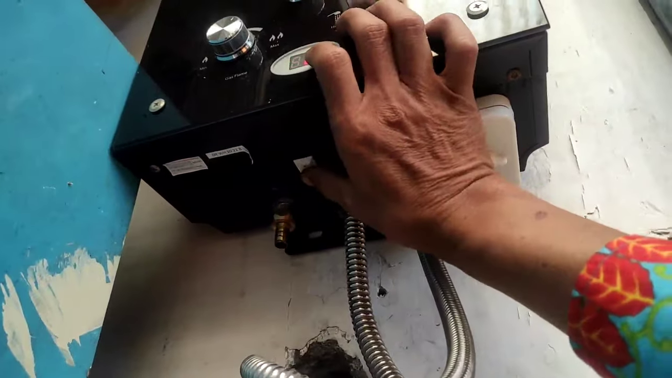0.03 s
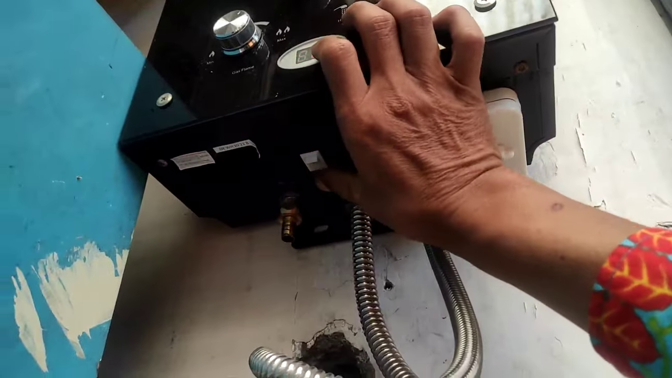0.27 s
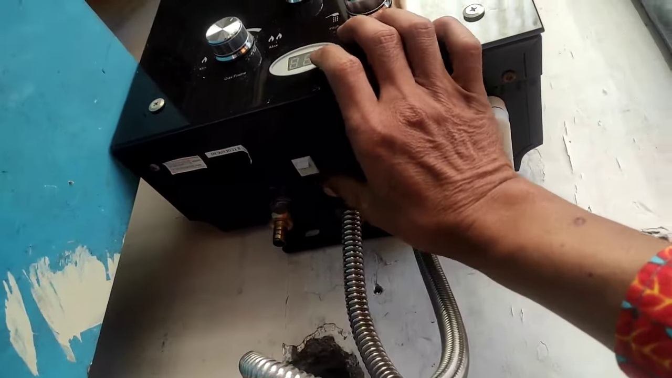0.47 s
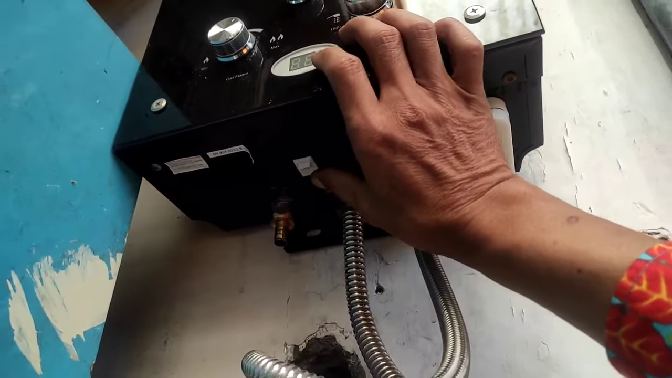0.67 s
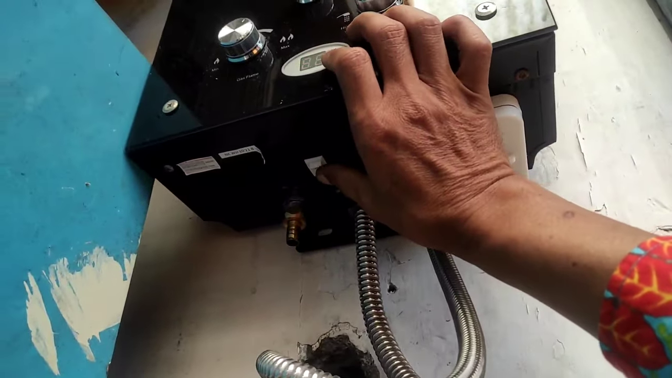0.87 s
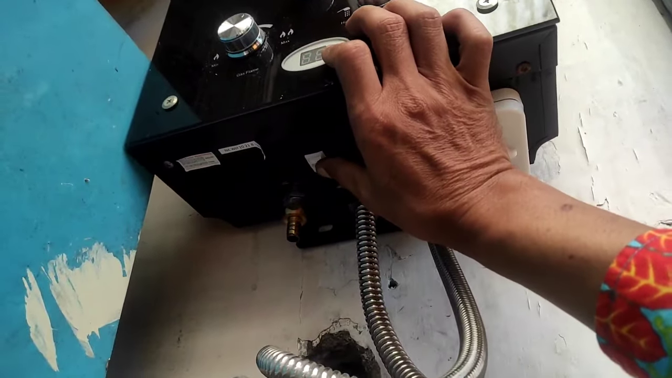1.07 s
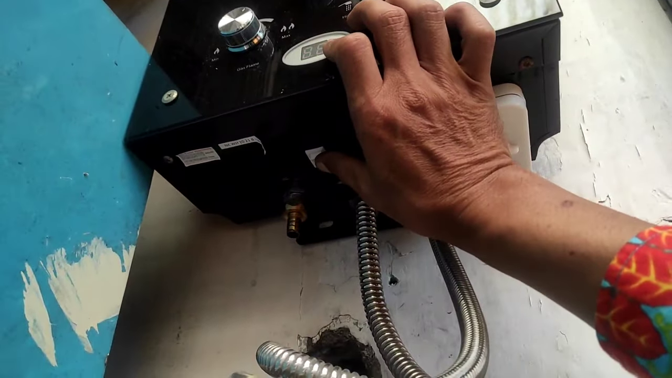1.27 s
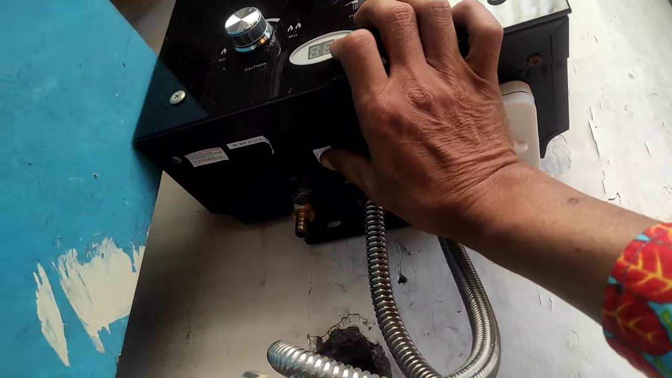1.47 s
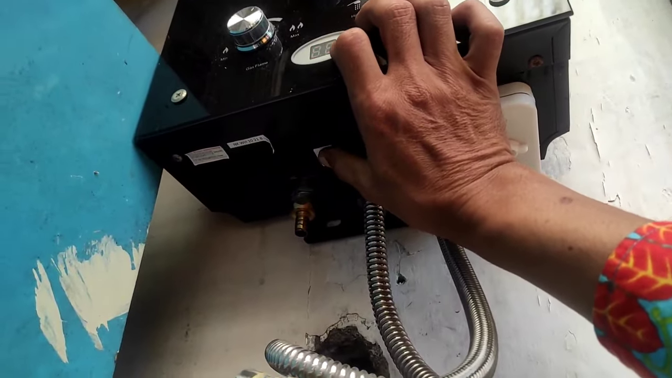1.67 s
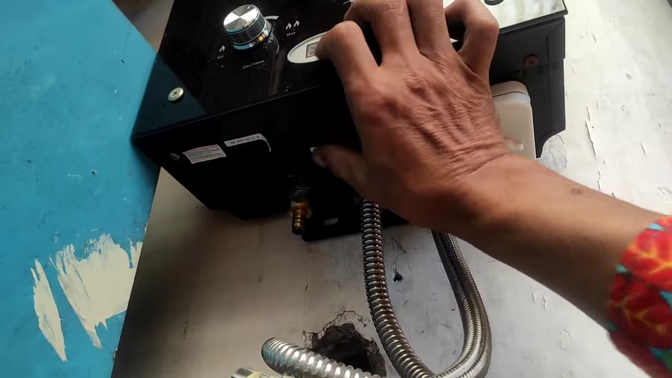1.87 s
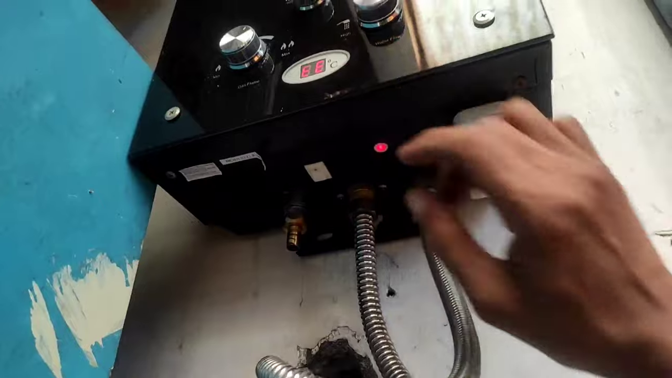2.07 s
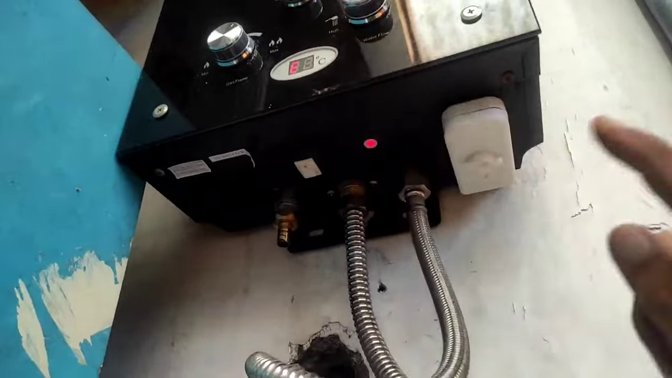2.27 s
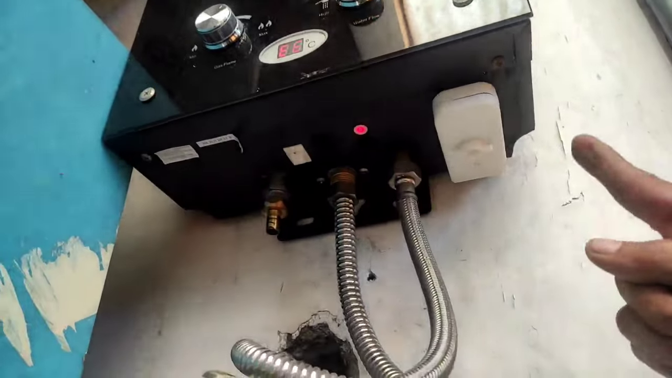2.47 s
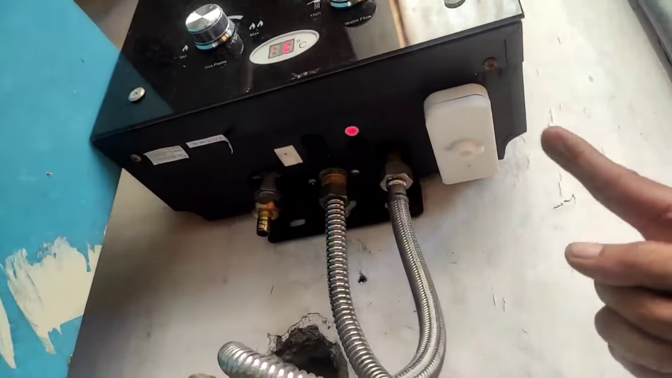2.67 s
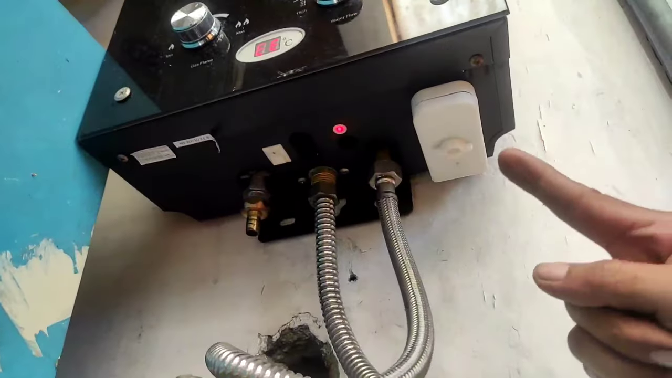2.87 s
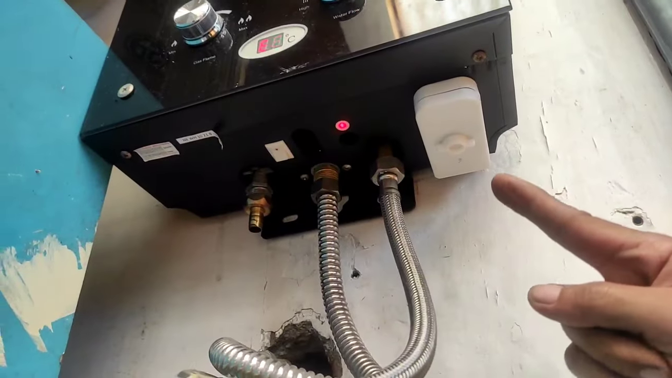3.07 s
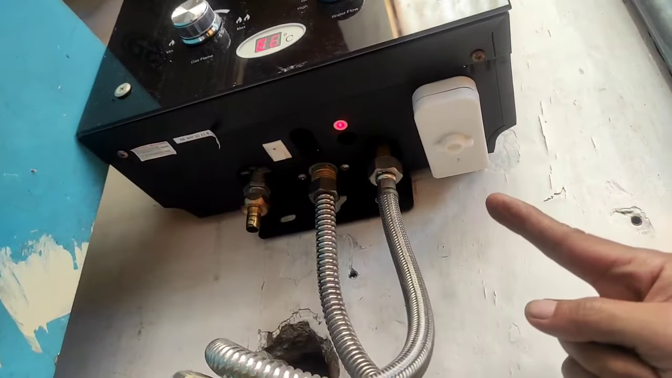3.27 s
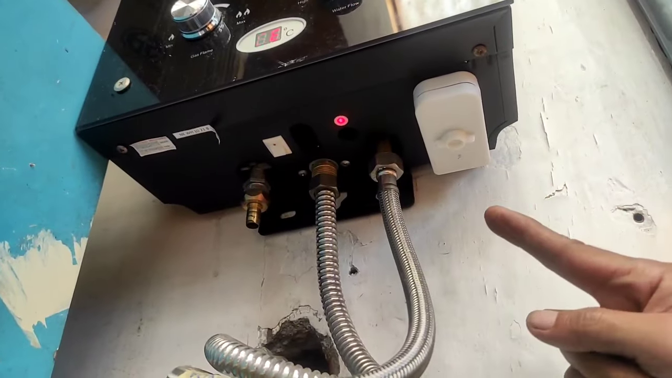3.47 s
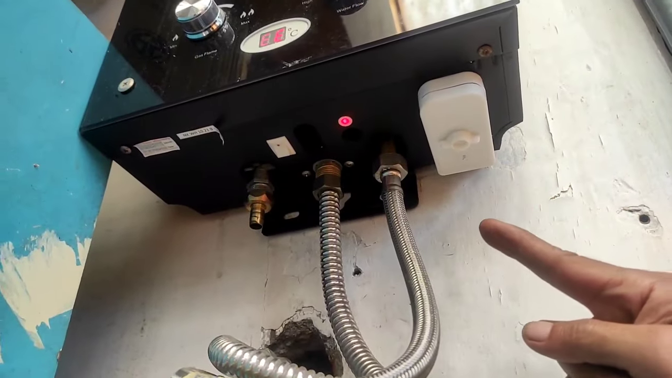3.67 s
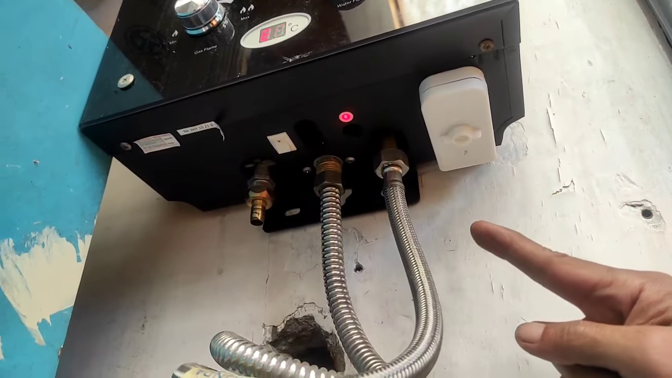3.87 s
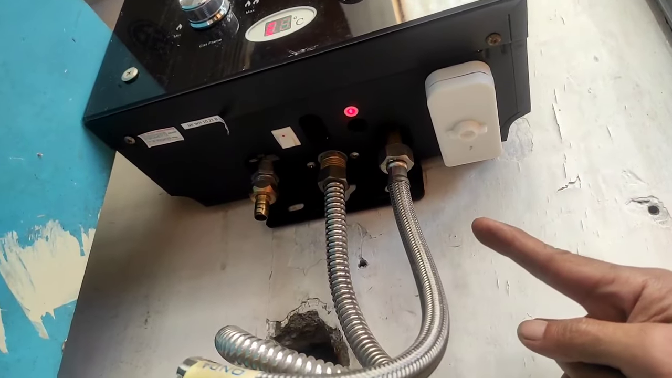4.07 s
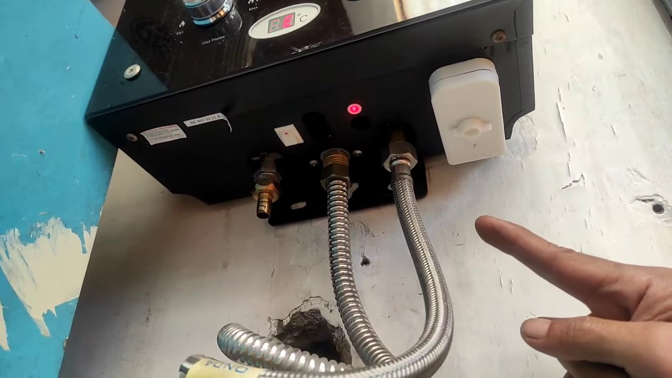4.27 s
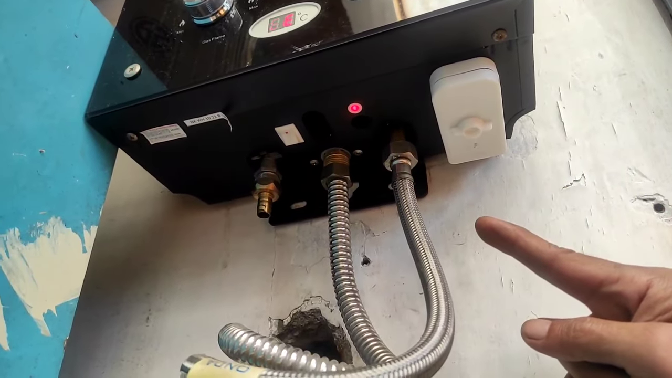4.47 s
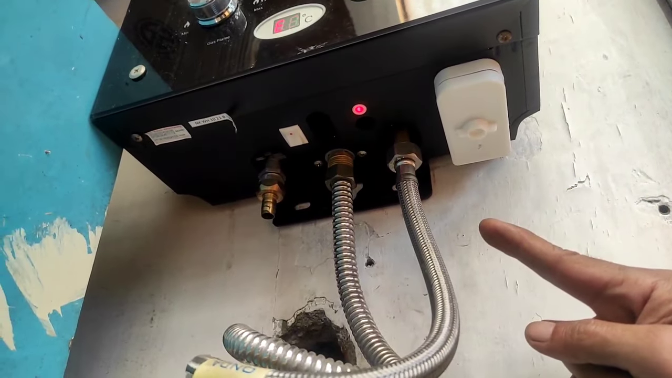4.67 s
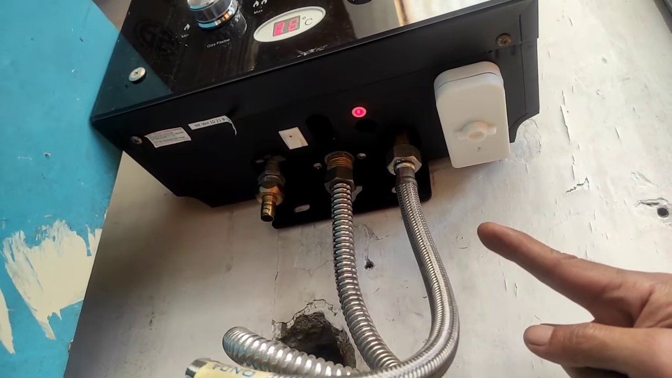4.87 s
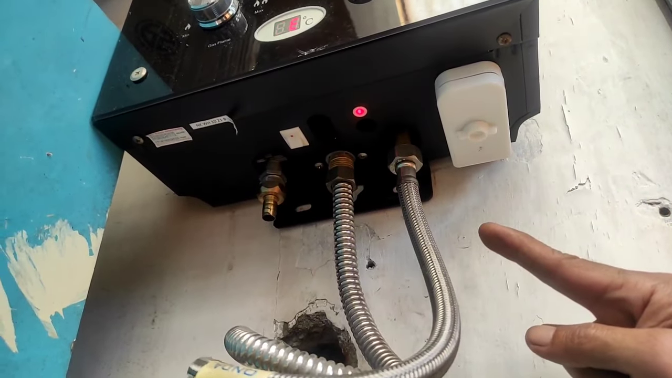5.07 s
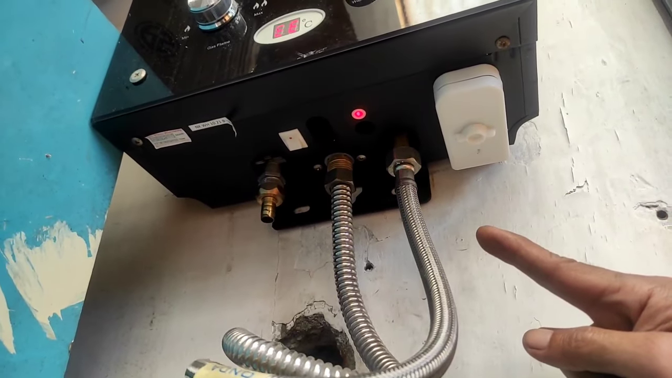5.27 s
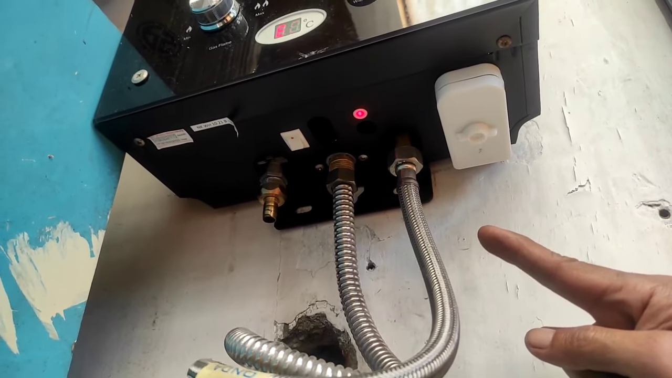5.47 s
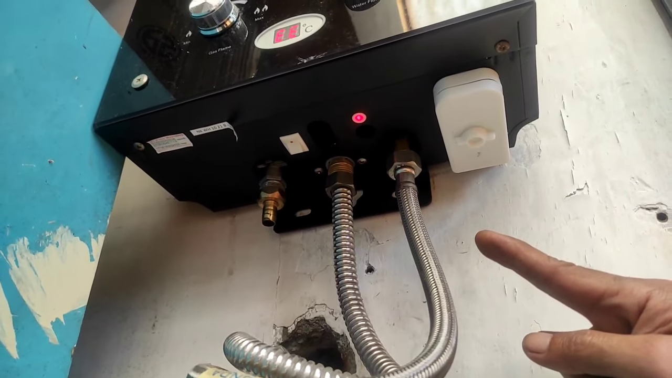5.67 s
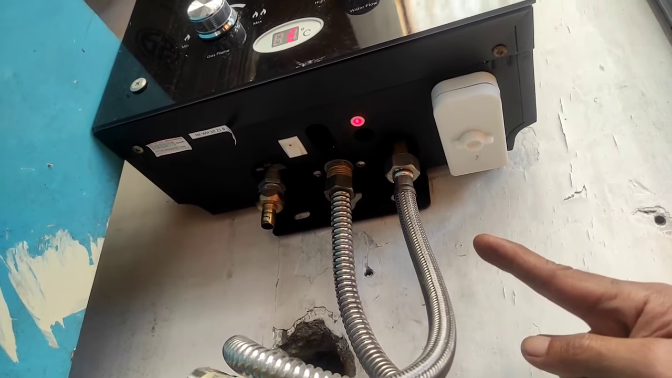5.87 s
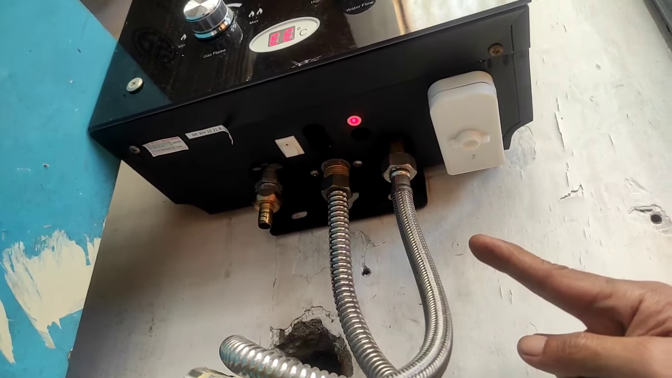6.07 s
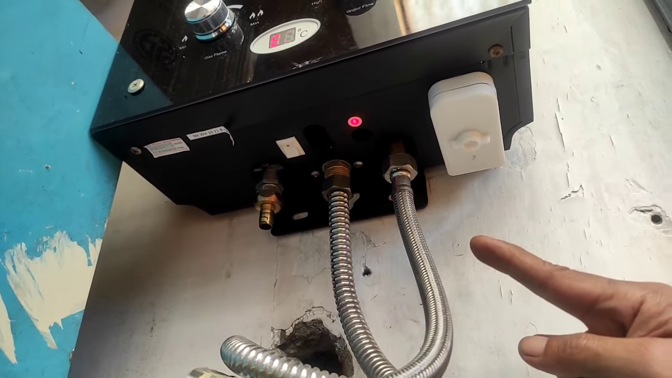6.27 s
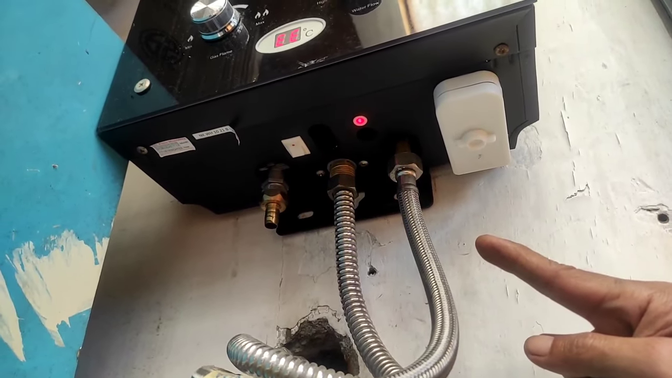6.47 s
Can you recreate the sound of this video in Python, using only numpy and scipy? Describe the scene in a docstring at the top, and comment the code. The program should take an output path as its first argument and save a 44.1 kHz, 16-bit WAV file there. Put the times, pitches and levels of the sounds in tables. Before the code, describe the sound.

Close metallic clicks and a casing knock, then rapid bright electric sparking at about fourteen ticks a second over a low workshop hum and faint hiss.

```python
"""A small workshop with a low hum and thin air noise, where a wall-mounted gas water heater is heard close by.
Its switch clicks, then snaps 1.6 s later, and knocks the sheet-metal casing: noise bursts through resonances.
The igniter sparks about 14 times a second, more slowly for a moment; each crack rings the burner chamber.
A solenoid valve clacks open and a faint flow of filtered noise hisses, but no flame is heard."""
import sys
import numpy as np
from scipy import signal
from scipy.fft import rfft, irfft, next_fast_len
from scipy.io import wavfile
from scipy.ndimage import uniform_filter1d, map_coordinates

SR = 44100
rng = np.random.default_rng(int(sys.argv[2]) if len(sys.argv) > 2 else 0)


def unload_wav(signal):
    """Save mono or channel-first audio to the path in sys.argv[1] as 16-bit WAV at rate SR, clipped to [-1, 1]."""
    wavfile.write(
        sys.argv[1],
        SR,
        np.round(np.clip(np.atleast_2d(signal).T, -1, 1) * 32767).astype(np.int16),
    )


N = 287973  # length of the scene in samples
SIZE = 16384  # length of one short sound in samples
HZ = np.fft.rfftfreq(SIZE, 1 / SR)
T = np.arange(SIZE) / SR
VALVE_S = 2.1992  # the solenoid valve pulls in
FLEX_S = 0.00277  # the casing knocks this long after a blow


def amp(db):
    """Turn decibels into gain."""
    return 10 ** (np.asarray(db) / 20)


def unit(x):
    """Scale to rms 1."""
    return x / np.sqrt(np.mean(x ** 2) + 1e-20)


def along(points, hz):
    """Read values between (frequency, value) points on a logarithmic frequency axis."""
    f, value = np.transpose(points)
    return np.interp(np.log(hz + 1), np.log(f + 1), value)


def pan(lean_db):
    """Left and right gains for a level difference, left minus right."""
    return amp(np.array([[0.5], [-0.5]]) * lean_db)


def add(track, s, sound):
    """Mix a short sound in at time s."""
    part = track[:, round(s * SR):][:, :SIZE]
    part += sound[:, :part.shape[1]]


def resonances(modes, hz):
    """Gain of a body that responds most strongly near each of its own frequencies."""
    power = 0
    for center, width, db in modes:
        damping = (hz * width) ** 2
        power = power + amp(db) ** 2 * damping / ((center ** 2 - hz ** 2) ** 2 + damping)
    return np.sqrt(power)


def ringing(gain):
    """Response of a body with this gain, which rings only after the blow (minimum phase)."""
    cepstrum = irfft(np.log(gain + 1e-5))
    # move the half that lies before the blow to after it
    fold = 1 + np.sign(SIZE // 2 - np.arange(SIZE))
    fold[0] = 1
    return np.exp(rfft(cepstrum * fold))


def ring(x, gain):
    """Pass a short sound through a body of this gain."""
    return irfft(rfft(x) * ringing(gain))


def dying(t60, rise):
    """An envelope that swells in about rise seconds while it falls 60 dB every t60 seconds."""
    swell = 1 - np.exp(-(T / rise) ** 2)
    return amp(-60 * T / t60) * swell


def scatter(fade, count=6):
    """A cloud of reflections for each ear under this envelope, with a nearly even spectrum and energy 1."""
    x = rng.standard_normal((2, SIZE)) * fade
    for _ in range(count):
        z = rfft(x)
        x = irfft(z / (np.abs(z) + 1e-12))  # even out the spectrum
        energy = np.abs(uniform_filter1d(x ** 2, size=24))
        x = x * fade / np.sqrt(energy + 1e-16)  # restore the envelope
    return x / np.linalg.norm(x, axis=1, keepdims=True)


# How alike the two ears are: (frequency [Hz], left-right likeness [0 to 1])
EAR_LIKENESS = [(60, 0.89), (150, 1), (380, 0.61), (950, 0.48), (2400, 0.096), (6000, 0.18), (15000, 0.077)]


def spread(z, hz):
    """Two unrelated spectra become left and right: alike in the bass, apart in the treble."""
    turn = np.arccos(np.clip(along(EAR_LIKENESS, hz), 0, 1)) / 2
    mid, side = z * [np.cos(turn), np.sin(turn)]
    return np.array([mid + side, mid - side])


# How long reflections last in the workshop: (frequency [Hz], time to fall 60 dB [s])
ROOM_DECAY = [(200, 0.45), (1000, 0.43), (2500, .33), (8000, 0.26), (14000, 0.17)]


def room():
    """A fresh tail of room reflections, energy 1 on the left; the treble dies first."""
    hz, t, z = signal.stft(rng.standard_normal((2, SIZE)), SR, nperseg=256)
    fade = amp(-60 * t / along(ROOM_DECAY, hz)[:, None])
    tail = signal.istft(z * fade, SR, nperseg=256)[1][:, :SIZE]
    tail = tail * (1 - np.exp(-T / 0.0082))  # reflections build up gradually
    return tail / np.linalg.norm(tail[0])


# Balance of the steady noises: (frequency [Hz], left minus right level [dB])
NOISE_LEAN = [(60, 4.5), (130, 8), (290, 2), (640, 4), (1410, 1.5), (3100, -0.5), (6820, -5), (15000, 4.5)]


def noise(gain):
    """Steady stereo noise of rms 1, colored by a gain for each frequency."""
    size = next_fast_len(N + SIZE)
    hz = np.fft.rfftfreq(size, 1 / SR)
    z = spread(rfft(rng.standard_normal((2, size))), hz)
    colored = z * gain(hz) * pan(along(NOISE_LEAN, hz))
    return unit(irfft(colored, size)[:, :N])


# Tones of a distant motor: (multiple of shaft speed [1], rms level before panning [dB])
MOTOR_TONES = [(1, -57), (2, -59), (5, -48)]


def motor(shaft_hz=29.1, waver=0.012):
    """A distant motor hums at multiples of its slightly unsteady shaft speed."""
    # ten random speed changes a second, joined by straight lines
    drift = map_coordinates(rng.standard_normal(N * 10 // SR + 4), [np.arange(N) * 10 / SR], order=1)
    turns = np.cumsum(shaft_hz * (1 + waver * drift)) / SR
    hum = sum(amp(db) * np.sqrt(2) * np.sin(2 * np.pi * order * turns) for order, db in MOTOR_TONES)
    return pan(lean_db=3) * hum


# Color of the low room noise: (frequency [Hz], relative level per Hz [dB])
RUMBLE_COLOR = [(15, -22), (28, 6), (42, -9), (58, 3.5), (70, -2.5), (100, 0.5), (125, -2.5), (200, 0.5),
                (280, -8.5), (350, -7.5), (470, -14), (700, -22.5), (1500, -49)]
# Narrow resonances of the room noise: (frequency [Hz], width [Hz], relative level [dB])
DRONE_MODES = [(167, 23, -1.5), (184, 10.2, -1), (535.4, 6.9, -11.5), (785.6, 19, -11), (1021, 27, -11),
               (1107.3, 9.1, -6), (1236, 5.3, -8.5)]
# Color of the thin air noise: (frequency [Hz], relative level per Hz [dB])
AIR_COLOR = [(300, -41), (600, -6), (1050, -2.5), (1500, -3.5), (2500, -3.5), (3400, -7), (4400, -15),
             (5700, -16.5), (6700, -9), (7800, -1), (8700, -9), (9800, -18.5), (10600, -35.5), (15000, -33)]


def workshop(rumble_db=-44, drone_db=-46, air_db=-46):
    """Steady noise filtered into a rumble, droning room resonances and thin air."""
    rumble = noise(lambda hz: amp(along(RUMBLE_COLOR, hz)))
    drone = noise(lambda hz: resonances(DRONE_MODES, hz) / (1 + (hz / 2000) ** 4))
    air = noise(lambda hz: amp(along(AIR_COLOR, hz)))
    return amp(rumble_db) * rumble + amp(drone_db) * drone + amp(air_db) * air


def blow(gain, t60, room_db, lean_db):
    """One hard contact: a rattle of reflections and the room's tail, both through the body's gain."""
    rattle = scatter(dying(t60, rise=0.00032)) + amp(room_db) * room()
    return pan(lean_db) * ring(irfft(spread(rfft(rattle), HZ)), gain)


# Resonances of the sheet-metal casing: (frequency [Hz], width [Hz], relative level [dB])
CASING_MODES = [(184, 14, 4), (240, 17, -4), (324, 14, 8.5), (411, 15, -1.5), (547, 14, -7),
                (744, 30, -1.5), (816, 35, -3.5), (920, 43, -2.5), (1080, 46, 2), (1280, 19, 0.5)]


def knock(casing_room_db=-7):
    """One push rings the sheet-metal casing, with the room's answer."""
    sheet = resonances(CASING_MODES, HZ) / (1 + (HZ / 1800) ** 4)
    push = (T == 0) + amp(casing_room_db) * irfft(spread(rfft(room()), HZ))
    return pan(lean_db=6.5) * ring(push, sheet)


# Contacts of the switch, relative levels:
# (time [s], press level [dB], snap level [dB], casing knock level [dB])
SWITCH_CONTACTS = [(0.0615, -1, -62, -2), (1.688, -28, -1.5, 0), (1.6975, -8.5, -7, -12)]
# Color of a press: (frequency [Hz], relative level [dB])
PRESS_COLOR = [(200, -25), (700, -23), (1150, -2), (1800, -14.5), (2600, -6.5), (3600, -13), (5000, -6),
               (7200, 1.5), (8200, -4), (9400, -8), (10800, -26.5), (15000, -30)]
# Color of a snap: (frequency [Hz], relative level [dB])
SNAP_COLOR = [(200, -35), (1300, -25), (2600, -19), (3800, -25.5), (4700, -16.5), (5500, -23), (6700, -6.5),
              (7700, 5), (8700, -2), (10000, -22), (11000, -33), (15000, -28)]


def switch(press_db=23, snap_db=29, casing_db=19):
    """Switch parts strike home as short rattles; the casing flexes and knocks a moment later."""
    track = np.zeros((2, N))
    press_body, snap_body = amp(along(PRESS_COLOR, HZ)), amp(along(SNAP_COLOR, HZ))
    for s, press, snap, push in SWITCH_CONTACTS:
        press_sound = blow(press_body, t60=0.09, room_db=-5.5, lean_db=-0.5)
        snap_sound = blow(snap_body, t60=0.049, room_db=-8.5, lean_db=1.5)
        add(track, s, amp(press_db + press) * press_sound)
        add(track, s, amp(snap_db + snap) * snap_sound)
        add(track, s + FLEX_S, amp(casing_db + push) * knock())
    return track


def spark_strength(s, first_s):
    """Gain of one spark: the first are weaker, one right after the valve clack is quieter, all slowly weaken."""
    usual_db, scatter_db = 19, 0.6  # usual level; chance difference between sparks
    start_weak_db, build_s = 3.5, 0.33  # the first sparks are weaker and soon reach full level
    after_clack_db, after_clack_s = 5, 0.1  # a spark right after the loud valve clack is quieter
    droop_db_per_s = 0.1255
    running = s - first_s
    building = start_weak_db * np.exp(-running / build_s)
    after_clack = after_clack_db * (VALVE_S < s < VALVE_S + after_clack_s)
    droop = droop_db_per_s * running
    return amp(usual_db - building - after_clack - droop + scatter_db * rng.normal())


# Even runs of sparks, slower while the valve draws current:
# (first spark [s], last spark [s], number of sparks [count])
SPARK_TIMES = [(1.7444, 2.1702, 7), (2.2602, 2.6519, 5), (2.7352, 3.3771, 10), (3.4482, 6.5052, 44)]
# Ringing of the burner chamber: (frequency [Hz], width [Hz], relative level [dB])
CHAMBER_MODES = [(4150, 220, -17), (4520, 120, -23), (5000, 210, -20), (5720, 200, -14), (5970, 130, -13),
                 (6350, 70, -13), (6570, 50, -12), (6840, 45, -11), (6955, 40, -12), (7075, 45, -8),
                 (7145, 60, -6), (7290, 50, -7), (7515, 50, -4), (7615, 80, 1.5), (7830, 55, -6),
                 (8040, 45, -6), (8267, 45, -3), (8470, 80, 0), (8620, 55, -3), (8805, 60, -1),
                 (9100, 55, -5), (9238, 60, -5), (9415, 65, -7), (9560, 100, -12), (9930, 160, -17),
                 (10700, 260, -17), (11400, 300, -26), (12600, 300, -25), (13200, 350, -22),
                 (15080, 450, -20)]
# The bare crack of a spark: (frequency [Hz], relative level [dB])
CRACK_COLOR = [(200, -52), (1000, -41.5), (2500, -23.5), (4600, -30), (8000, -19.5), (10300, -25),
               (14000, -30), (16000, -39)]
# Balance of a spark's direct sound: (frequency [Hz], left minus right level [dB])
SPARK_BALANCE = [(3000, 1.5), (4200, -0.5), (5000, 0), (6000, -6), (7500, -8.5), (8200, -4.5), (8900, 10.5),
                 (10000, 5), (13000, 0.5)]


def sparks(late_db=-15, stray_db=-6, ring_room_db=-11, crack_room_db=-2, lead_s=0.0003, bright_db=2.5):
    """Each spark cracks and rings the burner chamber by the same paths, but the arc strays a little."""
    track = np.zeros((2, N))
    chamber, crack = resonances(CHAMBER_MODES, HZ), amp(along(CRACK_COLOR, HZ))
    direct = ringing(np.hypot(chamber, crack) * pan(along(SPARK_BALANCE, HZ)))
    echo = ringing(np.hypot(amp(ring_room_db) * chamber, amp(crack_room_db) * crack))
    early = dying(t60=0.042, rise=0.00041)
    late = amp(late_db) * dying(t60=0.037, rise=0.0026)
    fade = early + late
    paths = scatter(fade, count=12)  # shared by all sparks
    tails = [echo * rfft(room()) for _ in range(10)]
    octaves = np.log2((HZ + 500) / 8000)
    times = np.concatenate([np.linspace(a, b, int(count)) for a, b, count in SPARK_TIMES])
    for s in times:
        stray = amp(stray_db) * rng.standard_normal((2, SIZE)) * fade / np.linalg.norm(fade)
        tilt = amp(bright_db * np.tanh(rng.normal()) * octaves)  # some arcs are brighter
        tail = tails[rng.integers(len(tails))]
        tick = irfft(rfft(paths + stray) * direct * tilt + tail)
        add(track, s - lead_s, spark_strength(s, times[0]) * pan(lean_db=-0.27) * tick)
    return track


# Color of the plunger's blow: (frequency [Hz], relative level [dB])
PLUNGER_COLOR = [(200, -20), (650, -25), (1200, -9.5), (1600, -6), (2200, 1), (3000, -0.5), (3900, -16),
                 (5000, -8), (6000, -3.5), (6800, -7.5), (8200, 0.5), (10500, -13.5), (13500, -22),
                 (15000, -39)]
# Ringing of the valve body: (frequency [Hz], width [Hz], relative level [dB])
VALVE_MODES = [(1450, 45, -5), (2060, 45, 0), (2160, 40, -1), (2320, 35, 0), (2970, 35, 2), (4610, 35, -7),
               (5070, 35, -1), (5370, 30, -3), (5965, 25, 7), (7000, 35, -2), (7660, 70, 2),
               (11300, 80, -13), (13800, 90, -9)]


def valve(plunger_db=22.5, knock_db=8.5):
    """The solenoid's plunger strikes home, rings the valve body and then knocks the casing."""
    track = np.zeros((2, N))
    body = np.hypot(amp(along(PLUNGER_COLOR, HZ)), resonances(VALVE_MODES, HZ))
    add(track, VALVE_S, amp(plunger_db) * blow(body, t60=0.055, room_db=-3, lean_db=3))
    add(track, VALVE_S + FLEX_S, amp(knock_db) * knock())
    return track


# Color of the flow's hiss: (frequency [Hz], relative level [dB])
FLOW_COLOR = [(300, -22), (900, -1.5), (1400, 3.5), (2000, -10.5), (2800, 2), (3700, -5), (5000, -26),
              (8000, 6), (11000, -22), (15000, -13)]


def flow(level_db=-48, opens_s=2.23, rise_s=0.78):
    """A faint hiss of filtered noise builds up evenly once the valve is open, then stays steady."""
    opening = np.clip((np.arange(N) / SR - opens_s) / rise_s, 0, 1)
    return amp(level_db) * opening * noise(lambda hz: amp(along(FLOW_COLOR, hz)))


def scene():
    """The heater in its room."""
    return motor() + workshop() + switch() + sparks() + valve() + flow()


def record(dry, top_hz=15700):
    """Peaks beyond full scale clip, then a steep filter removes the highest treble."""
    size = next_fast_len(N + SIZE)
    hz = np.fft.rfftfreq(size, 1 / SR)
    clipped = np.clip(dry, -1, 1)
    return irfft(rfft(clipped, size) / (1 + (hz / top_hz) ** 80), size)[:, :N]


dry = scene()
out = record(dry)
unload_wav(out)
```